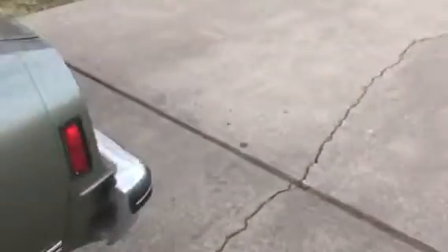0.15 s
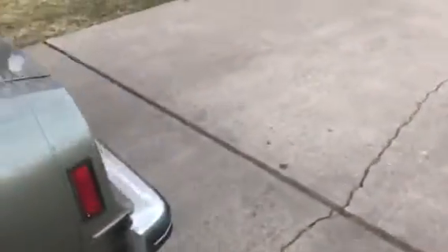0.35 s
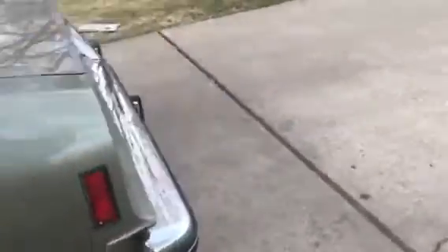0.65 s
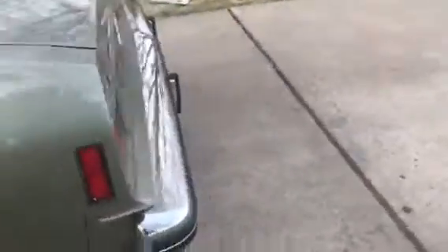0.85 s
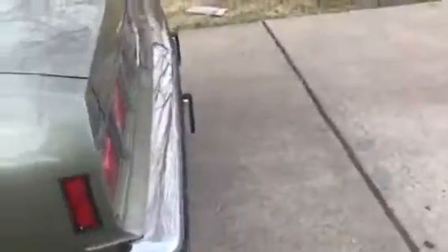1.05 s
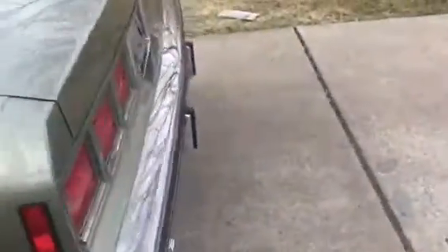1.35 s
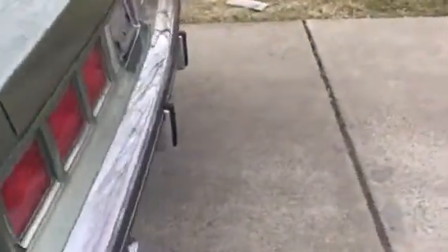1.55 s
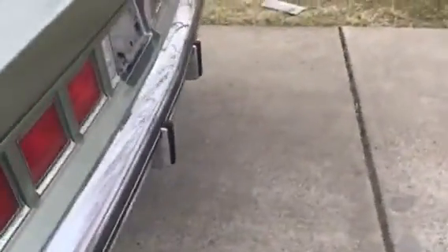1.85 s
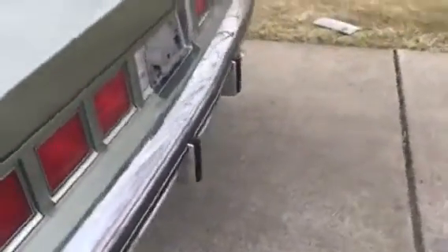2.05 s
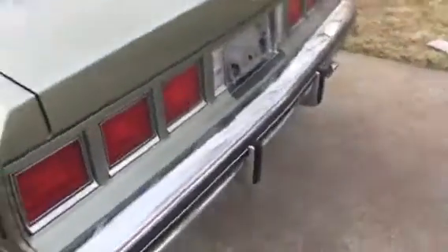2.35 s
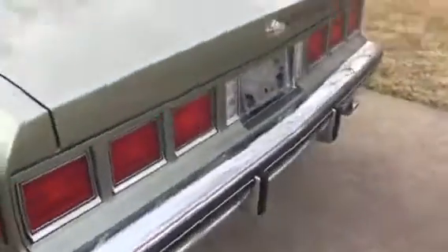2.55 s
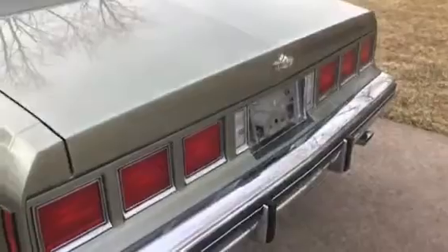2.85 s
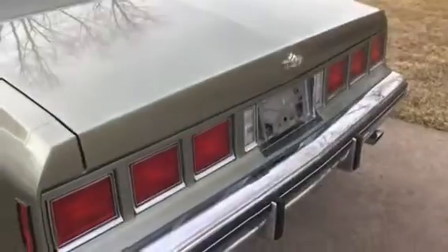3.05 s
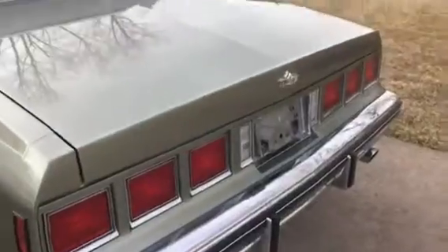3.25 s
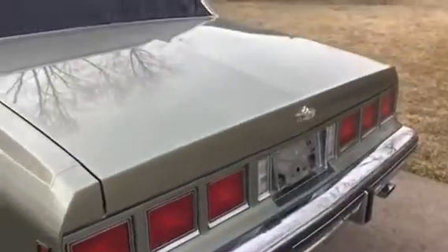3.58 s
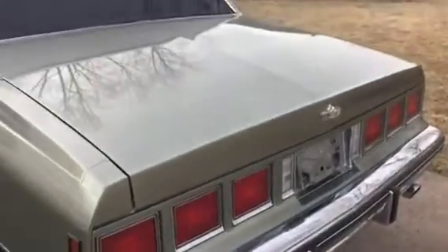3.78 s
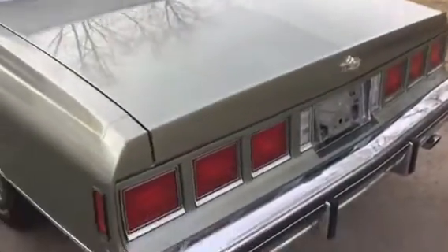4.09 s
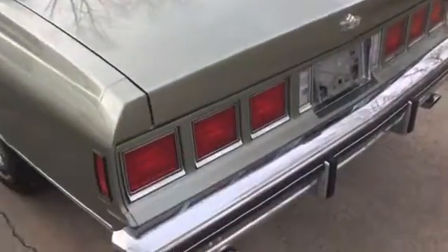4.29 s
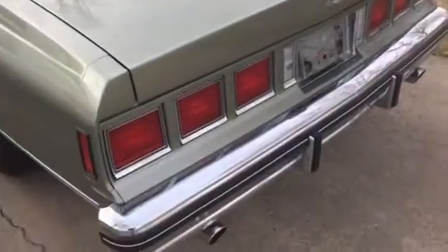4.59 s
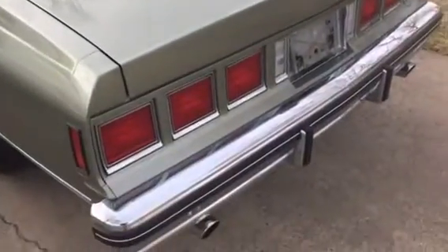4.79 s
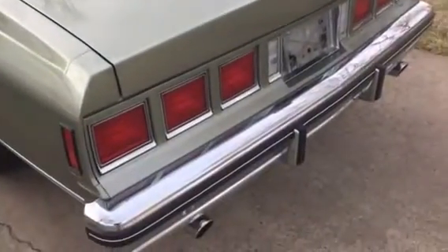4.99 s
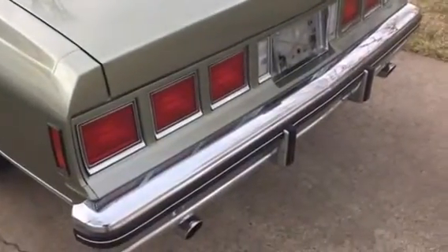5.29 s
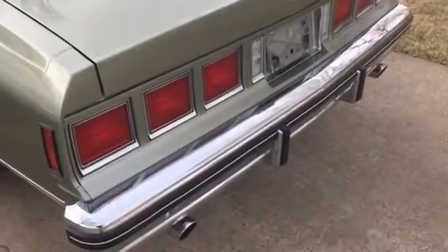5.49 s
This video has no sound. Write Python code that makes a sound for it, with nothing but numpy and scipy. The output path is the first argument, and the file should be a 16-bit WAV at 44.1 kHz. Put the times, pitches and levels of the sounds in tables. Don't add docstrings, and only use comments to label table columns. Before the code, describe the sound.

Low, throaty car exhaust drops from fast to slow idle, with faint ticks, squeaks and a brief crunchy footstep on concrete.

```python
import sys
import numpy as np
from scipy import signal
from scipy.fft import rfft, irfft, next_fast_len
from scipy.io import wavfile
from scipy.ndimage import uniform_filter1d

SR = 44100
rng = np.random.default_rng(int(sys.argv[2]) if len(sys.argv) > 2 else 0)


def log_audio(samples):
    frames = np.atleast_2d(samples).T
    limited = np.clip(frames, -1, 1)
    pcm = np.round(limited * 32767).astype(np.int16)
    wavfile.write(sys.argv[1], SR, pcm)


def field_ratio(decibels):
    return 10 ** (np.asarray(decibels, dtype=float) / 20)


N = 248283
T = np.arange(N) / SR
IDLE, FAST_IDLE = 44.7, 53.5


def evened(x):
    return x / np.sqrt(np.mean(x ** 2) + 1e-20)


def curves(rows, t=T):
    s, *columns = np.transpose(rows)
    return [np.interp(t, s, column) for column in columns]


def coloured(x, points):
    f, db = np.transpose(points)
    size = next_fast_len(len(x))
    hz = np.fft.rfftfreq(size, 1 / SR)
    gain = field_ratio(np.interp(np.log(hz + 1), np.log(f), db))
    return irfft(rfft(x, size) * gain, size)[:len(x)]


def ring(x, modes):
    return [field_ratio(db) * signal.lfilter(*signal.iirpeak(hz, hz / width, SR), x) for hz, width, db in modes]


def smooth(x, size):
    return uniform_filter1d(uniform_filter1d(x, size), size)


def drift(seconds):
    return evened(smooth(rng.standard_normal(N), int(seconds * SR)))


# [s, firings per second]
SPEED = [(0.0, 53.65), (0.72, 53.47), (0.8, 53.32), (1.3, 52.06), (1.64, 52.23), (1.8, 51.94), (1.98, 50.6),
         (2.37, 46.01), (2.58, 44.81), (2.79, 44.2), (2.99, 44.03), (3.39, 45.34), (3.53, 45.22),
         (3.9, 44.38), (4.37, 45.06), (4.65, 44.78), (5.43, 44.57), (5.63, 44.63)]


def fast_share(t=T):
    return (curves(SPEED, t)[0] - IDLE) / (FAST_IDLE - IDLE)


def cycle():
    start_turns = -.25 / 8
    return np.cumsum(curves(SPEED)[0]) / SR / 8 + start_turns


# [s, 0-1, dB]
ROUND = [(0, 0.01, 0), (.5, 0.17, -1), (.75, 0.37, -0.4), (1, 0.23, 1.5), (1.5, 0.62, -0.35),
         (2.1, 0.86, -1.5), (2.4, 0.76, 0.7), (3, .98, 0), (3.5, 0.78, 0.9), (4, 0.8, 0.6),
         (4.5, 0.92, 0.56), (5.2, 0.77, 1.1), (5.63, 0.89, 0.3)]


def heard(rows):
    fast = fast_share()
    behind, aim_db = curves(ROUND)
    return [db + behind_db * behind + fast_db * fast + share * aim_db
            for db, behind_db, fast_db, share in rows]


PUFFS = [
    [-4, -6, -5, -9, -10, -3, 0, -2],
    [-12, -8, -1, -2, -4, -1, -3, -7],
    [-5, -6, -8, -14, -15, 0, -2, -7],
    [-7, -9, -9, -14, -16, -14, -1, 0],
]


def puffs(pattern_db, decay, steady, knock=0):
    fired = cycle() * 8
    index = np.floor(fired).astype(int)
    db = np.array(pattern_db)[index % 8] + 1.7 * rng.standard_normal(400)[index + 8]
    noise = (steady + field_ratio(db) * np.exp(-(fired % 1) / decay)) * rng.standard_normal(N)
    late = np.floor(fired - .05 - .06 * drift(.02))
    knocks = np.diff(late, prepend=late[0]) * rng.choice([-1, 1], N)
    return noise + knock * field_ratio(db) * knocks


# [dB, dB, dB, ratio]
AIR = [
    (-44.5, -4.5, 11, .1),
    (-55, 2, 0.3, 0.8),
    (-1.43, 2, 1, 1.2),
    (-11.5, 10.5, -3, 0.91),
]
# [Hz, dB per Hz]
HISS = [(500, -32.5), (850, -5), (1080, -0.5), (1300, -9.5), (1440, -8.5), (1550, -9.5), (2120, -14),
        (2280, -10.5), (2810, -15.5), (3420, -15), (4870, -20.5), (6290, -20.5), (10400, -27),
        (11700, -23.5), (15700, -35)]


def engine_hiss():
    _, hiss_db, tilt_db, _ = heard(AIR)
    hiss = evened(coloured(rng.standard_normal(N) * field_ratio(0.71 * drift(.03)), HISS))
    treble = coloured(hiss, [(3000, -42.5), (6000, 2)])
    return field_ratio(hiss_db) * (hiss + (field_ratio(tilt_db) - 1) * treble)


# [Hz, Hz, dB]
BAY = [(1004, 24, 0.5), (1065, 22, -5), (1375, 17, -9.5), (1370, 17, -9), (1425, 9.9, -8), (2014, 31, -3.5),
       (2245, 39, -2.5), (3480, 150, -16), (3880, 75, -17.5)]


def bay_panels():
    drive = puffs(PUFFS[2], .7, .3)
    modes = sum(field_ratio(2.5 * drift(.12)) * mode for mode in ring(drive, BAY))
    return field_ratio(heard(AIR)[3]) * field_ratio(-60) * evened(modes)


# [0-1 of a cycle, dB]
TICKS = [
    (0.8, -56),
    (0.6, -47),
    (0.2, -45),
    (0.3, -48.5),
    (0.25, -56),
    (0.8, -62),
]
# [Hz, Hz, dB]
TICK_BODY = [
    (2280, 110, 0),
    (1420, 50, 2),
    (3350, 110, 3),
    (3640, 130, 1),
    (6200, 1200, -14),
]


def valve_ticks():
    blows, turns = np.zeros(N), cycle()
    for place, db in TICKS:
        at = np.flatnonzero(np.diff(np.floor(turns - place)))
        blows[at] += field_ratio(db + 3 * rng.standard_normal(40)[:len(at)])
    burst = rng.standard_normal(300) * np.exp(-np.arange(300) / 90)
    chatter = signal.oaconvolve(blows, burst)[:N]
    return field_ratio(heard(AIR)[3]) * sum(ring(chatter, TICK_BODY))


def squeak(hz):
    t = np.arange(1024) / SR
    scratch = 1 + .6 * evened(uniform_filter1d(rng.standard_normal(len(t)), 60))
    swell = t / .0045 * np.exp(1 - t / .0045)
    return scratch * swell * np.sin(2 * np.pi * hz * t * (1 - .6 * t))


# [0-8 firings, dB, Hz]
SQUEAKS = [(1.4, -58.5, 3380), (4.3, -63.5, 4100), (2.9, -63, 2900), (3, -58, 3390), (7.4, -60.5, 3350),
           (2.4, -64, 3200), (5.7, -58.5, 3670), (5.2, -64, 3000), (6.3, -61.5, 3350), (4.3, -59, 3420),
           (6.9, -64, 2300), (0.38, -61, 3600)]
# [s, dB, Hz]
RUBS = [(1.785, -57, 3320), (2.3552, -53, 3670), (2.4235, -56, 3670), (2.7753, -56, 3660),
        (3.093, -54, 3380), (3.2262, -56, 3570), (3.2721, -58, 3380), (3.4921, -51, 3670),
        (3.9845, -53, 3380), (4.1227, -50, 3490), (4.4559, -55, 3470), (4.521, -50.5, 3380),
        (4.7015, -55, 3340), (5.1, -52, 3690), (5.2362, -54, 3350)]


def loose_bracket():
    out, turns = np.zeros(N), cycle()
    near = field_ratio(-13 * (1 - curves(ROUND)[0]))
    for place, db, hz in SQUEAKS:
        rubs = np.diff(np.floor(turns - place / 8), prepend=0) > 0
        size = field_ratio(db + 2.5 * rng.standard_normal(40))[np.cumsum(rubs)]
        out += near * signal.oaconvolve(rubs * size, squeak(hz))[:N]
    for s, db, hz in RUBS:
        out[round(s * SR):][:1024] += field_ratio(db) * squeak(hz)
    return out


# [s, Hz, dB]
WHINE = [
    (0, 13800, -90),
    (.12, 13800, -78),
    (.3, 14000, -76),
    (.5, 13900, -78),
    (.66, 13900, -92),
    (5.63, 13900, -99),
]


def belt_whine():
    hz, db = curves(WHINE)
    phase = 2 * np.pi * np.cumsum(hz + 200 * drift(.002)) / SR
    return field_ratio(db + 4 * drift(.004)) * np.sin(phase)


# [s, s, Hz, Hz, dB]
SINGING = (2.75, .6, 1392, 12, -62)


def singing_panel():
    s, length, hz, width, db = SINGING
    shape = np.clip((T - s) / .04, 0, 1) * np.clip((s + length - T) / .3, 0, 1)
    return field_ratio(db) * shape * evened(ring(rng.standard_normal(N), [(hz, width, 0)])[0])


# [s, s, dB]
SCUFFS = [
    (1.908, .028, -55),
    (1.909, .012, -58),
    (2.596, .032, -54),
    (2.676, .008, -61),
]
# [s, dB, dB]
SNAPS = [
    (2.5875, -36, -3),
    (2.598, -35, -2),
    (2.6044, -36, 3),
    (2.6085, -30, -3),
    (2.6134, -36, 3),
    (2.6178, -36, 3),
    (2.6234, -31, -4),
    (2.6268, -34, -5),
    (2.6825, -30, -10),
    (2.6847, -42, -8),
]
# [Hz, dB per Hz]
GRIT = [(710, -41), (1200, -13), (1430, -9), (1660, -14), (1970, 2.5), (4230, 3), (5070, -3), (6160, 1.5),
        (7310, -4.5), (14400, -3.5), (15700, -16.5)]


def steps():
    grains = rng.standard_normal(N) * field_ratio(2.5 * drift(.001))
    stroke = sum(field_ratio(db) * np.clip((T - s) / 0.0026, 0, 1) * np.clip((s + length - T) / 0.037 + 1, 0, 1)
                 for s, length, db in SCUFFS)
    out = stroke * evened(coloured(grains, GRIT))
    t = np.arange(256) / SR
    for s, db, tilt_db in SNAPS:
        crack = rng.standard_normal(256) * np.exp(-t / .0006)
        snap = coloured(np.roll(crack, 30), GRIT)
        snap = coloured(snap, [(2000, -tilt_db / 2), (12000, tilt_db / 2)])
        out[round(s * SR):][:256] += field_ratio(db - 0.5) * snap / abs(snap).max()
    return out


# [Hz, dB per Hz]
CHUFF = [(25, -36.5), (45, -4), (90, 2), (140, -0.5), (200, -6), (280, -14.5), (370, -31), (480, -32.5),
         (700, -24.5), (1000, -44.5), (2000, -97)]


def gas_chuff():
    return field_ratio(heard(AIR)[0]) * evened(coloured(puffs(PUFFS[2], decay=0.95, steady=0.86), CHUFF))


# [dB, dB, dB, ratio]
LEVELS = [
    (-46.5, -3.5, 2.3, .1),
    (-47, -3, 5, .1),
    (-57.5, 10.5, 6, 0.44),
    (-46, -5.5, 2.8, .1),
]
# [Hz, Hz, dB]
SHELL = [
    [(251, 12, 0), (215, 30, -8)],
    [(318, 12, -3), (335, 7, 2), (392, 14, -13), (416, 14, -13)],
    [(522, 18, -1), (548, 16, -4), (570, 16, 0), (610, 14, -3)],
    [(672, 18, 0), (720, 30, -12), (770, 14, -8)],
]


def silencer_shells():
    out = 0
    for db, pattern_db, modes in zip(heard(LEVELS), PUFFS, SHELL):
        rung = ring(puffs(pattern_db, .7, .08, knock=25), modes)
        part = sum(ring(x, [(hz, 4 * width, 0)])[0] for x, (hz, width, _) in zip(rung, modes))
        energy = smooth(part ** 2, 7500)
        out = out + field_ratio(db) * part / np.sqrt(energy)
    return out


def silencers():
    return coloured(gas_chuff() + silencer_shells(), [(850, 0), (1500, -20), (4000, -50)])


# [0 = A or 1 = B, dB, ms, dB]
CYLINDERS = [(1.0, -0.93, 0.8, 6.49), (0.0, -3.35, -0.6, 21.07), (0.0, -8.96, -1.34, 18.15),
             (1.0, -0.55, -0.12, 13.94), (0.0, -13.11, -1.49, 24.46), (1.0, -2.24, -1.02, 12.01),
             (1.0, 0.23, -0.74, 9.81), (0.0, -1.93, -0.95, 21.95)]
# [Hz, Hz, dB, ms]
PIPE_A = [(34.03, 4.99, -15.46, 9.7), (45.59, 16.84, -20.82, 1.17), (77.91, 5.61, -42.9, 14.26),
          (96.64, 5.59, -26.48, 20.99), (97.61, 5.05, -23.83, 4.35), (110.46, 5.09, -32.04, 16.4),
          (121.52, 4.99, -40.01, 8.82), (141.45, 4.99, -42.95, 6.05), (154.41, 17.96, -33.27, 8.06),
          (173.15, 4.99, -44.02, 17.05), (197.24, 14.22, -44.46, 13.29), (254.29, 4.99, -36.42, 8.28)]
PIPE_B = [(50.11, 6.02, -37.72, 21.13), (61.8, 9.94, -30.42, 19.8), (83.23, 5.96, -24.45, 0.19),
          (85.91, 15.51, -19.68, 19.59), (98.14, 5.68, -21.82, 10.49), (128.34, 51.54, -8.96, 16.47),
          (130.26, 30.61, -14.73, 12.71), (144.1, 4.99, -36.56, 13.19), (173.97, 23.63, -26.75, 8.93),
          (177.25, 4.99, -47.74, 12.05), (221.84, 15.76, -43.71, 15.61), (268.09, 77.99, -16.65, 11.59)]
# [s, dB, dB, ms,
# ms]
PATHS = [(0.0, -12.87, -8.71, 1.23, -12.64), (0.5, -11.44, -7.41, 1.3, -12.54),
         (1.0, -9.65, -4.78, 1.15, -13.01), (1.5, -9.06, -3.7, 1.65, -12.67),
         (1.8, -7.57, -2.43, 1.79, -12.74), (1.95, -6.0, -3.15, 1.94, -12.89),
         (2.1, -4.24, -1.0, 1.16, -13.29), (2.2, -3.21, 2.12, 2.4, -13.09), (2.3, -2.58, 2.4, 1.59, -13.09),
         (2.45, 0.46, 5.67, 3.68, -11.93), (2.6, 2.47, 7.23, 4.86, -11.67), (3.0, 2.51, 6.42, 3.96, -12.08),
         (4.0, 1.82, 6.35, 4.08, -12.3), (5.63, 3.06, 6.51, 4.23, -12.08)]


def exhaust():
    t, order = T[::512], np.arange(6, 39)[:, None]
    s = 2j * np.pi * order * curves(SPEED, t)[0] / 8
    paths, fast, total = curves(PATHS, t), fast_share(t), 0
    burn = uniform_filter1d(rng.standard_normal((len(t), len(order), 4)), 9, 0).T * 3
    burn *= np.clip((order - 8) / 6, .15, 1)
    for bank, pipe in enumerate((PIPE_A, PIPE_B)):
        fires = sum(field_ratio(db + fast_db * fast) * np.exp(-2j * np.pi * order * k / 8 - s * ms / 1000)
                    for k, (b, db, ms, fast_db) in enumerate(CYLINDERS) if b == bank)
        fires += .17 * (burn[bank] + 1j * burn[2 + bank])
        rings = sum(field_ratio(db) * np.exp(-s * ms / 1000) * 2 * np.pi * hz
                    / ((s + np.pi * width) ** 2 + (2 * np.pi * hz) ** 2) for hz, width, db, ms in pipe)
        path = field_ratio(paths[bank]) * np.exp(-s * paths[2 + bank] / 1000)
        total = total + fires * rings * path
    total *= (s / (s + 250)) ** 2
    waver = uniform_filter1d(rng.standard_normal((len(t), len(order), 2)), 16, 0).T * 4
    total *= 1 + .005 * (order - 4) * (waver[0] + 1j * waver[1])
    turns, out = cycle(), 0
    step, turn = np.exp(2j * np.pi * turns), np.exp(2j * np.pi * turns * order[0])
    for strength in total:
        out = out + (np.interp(T, t, strength) * turn).real
        turn = turn * step
    return field_ratio(25) * out


def scene():
    bay = engine_hiss() + bay_panels() + valve_ticks() + loose_bracket() + belt_whine()
    return (bay + singing_panel() + steps() + silencers() + exhaust())[None]


def low_pass(x):
    return signal.sosfilt(signal.butter(12, 16220, fs=SR, output="sos"), x)


# [Hz, dB]
HANDSET = [(4200, 0.5), (4900, -2), (5600, 1), (7000, 1.5), (7700, -2.5), (8800, 2.5), (9800, 1),
           (10400, -3), (11500, -1.5), (13000, -1.5), (14200, 3.1)]


def record(dry):
    edge = signal.firwin(1023, 15740, window=("kaiser", 9), fs=SR)
    held = coloured(dry[0], HANDSET)[None]
    mix = signal.oaconvolve(held, edge[None], "same")
    return low_pass(mix)


dry = scene()
out = record(dry)
log_audio(out)
```